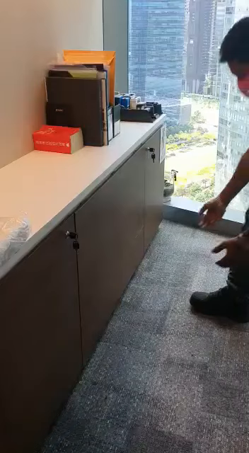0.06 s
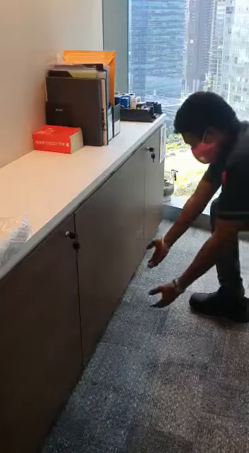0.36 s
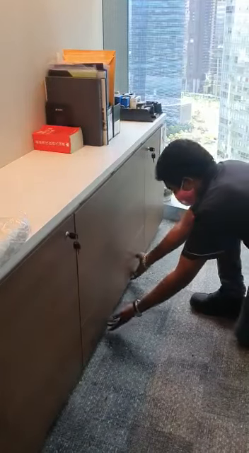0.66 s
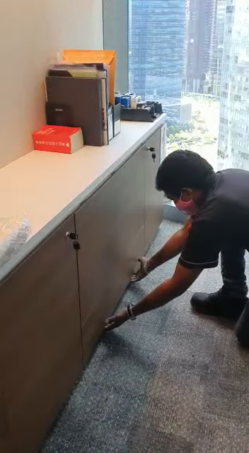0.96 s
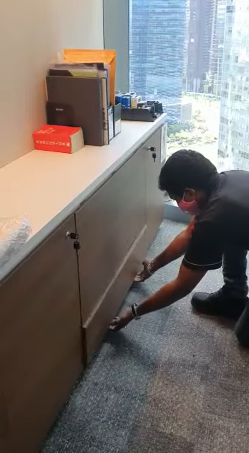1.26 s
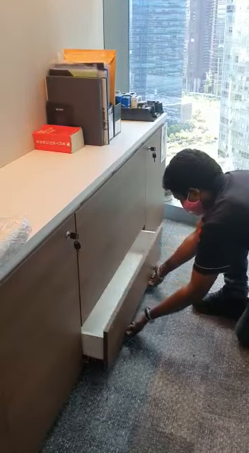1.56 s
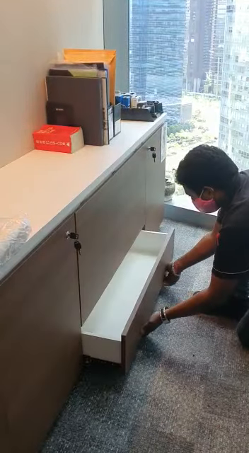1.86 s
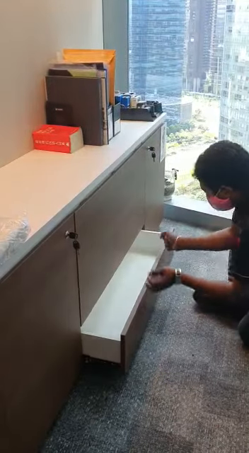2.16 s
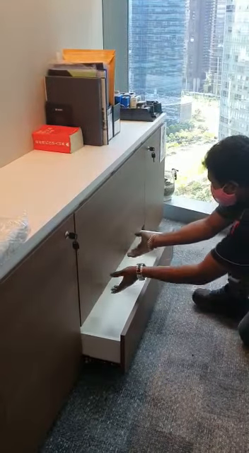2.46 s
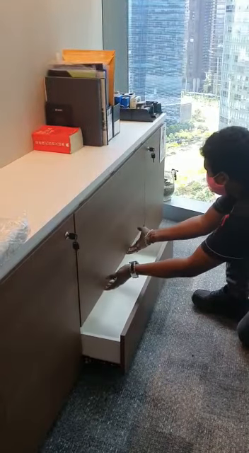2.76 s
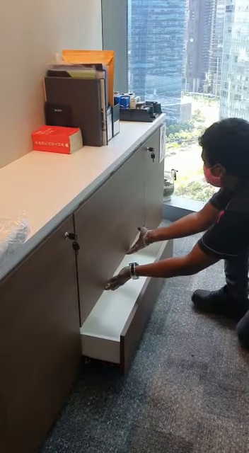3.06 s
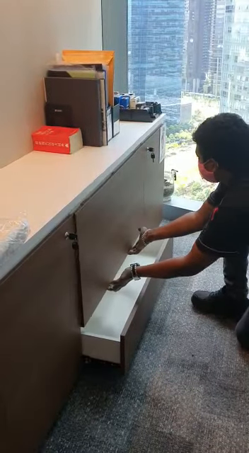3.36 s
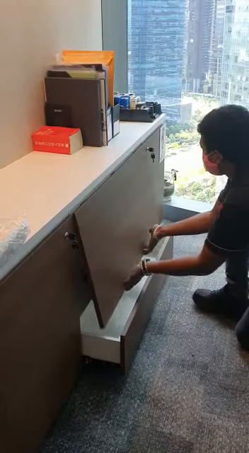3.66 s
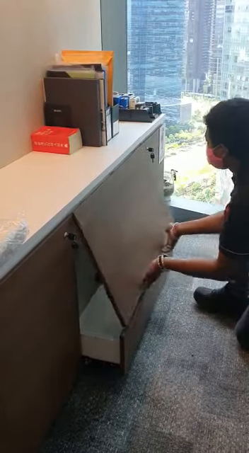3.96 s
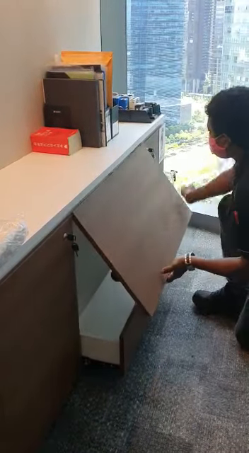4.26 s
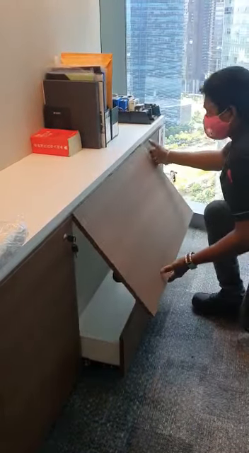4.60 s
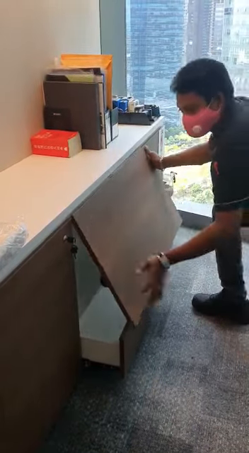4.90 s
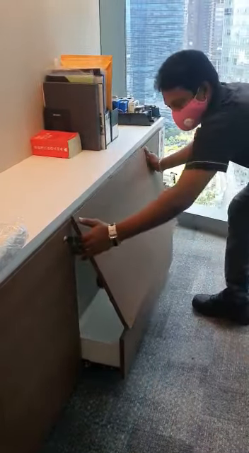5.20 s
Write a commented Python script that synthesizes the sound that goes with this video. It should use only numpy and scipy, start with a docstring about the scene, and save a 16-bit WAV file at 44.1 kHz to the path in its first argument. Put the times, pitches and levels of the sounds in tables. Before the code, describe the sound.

Low ventilation rumble fills a small carpeted office, picked up from a couple of metres. A dull bump on a wooden cabinet leads into the short scrape, thud and roll of a drawer opening. Cloth brushes softly against the wood. Then a panel is freed with hollow booms and clicks, and its board and fittings knock and rattle lightly as it is lifted.

```python
"""A wooden cabinet is bumped, its bottom drawer drawn out, and the panel above freed and swung up.
Blows make the hollow carcass boom in its low modes; boards knock and fittings click in higher ones.
The drawer scrapes and rolls by stick-slip friction, and sleeves and hands brush the wood.
Air conditioning rumbles through the carpeted office, and background hiss is stronger in the first second.
A phone listens from about two metres."""
import sys
import numpy as np
from scipy import signal
from scipy.fft import rfft, irfft
from scipy.io import wavfile
from scipy.ndimage import uniform_filter1d

SR = 44100
rng = np.random.default_rng(int(sys.argv[2]) if len(sys.argv) > 2 else 0)


def pcm_store(signal):
    """Save signal as 16-bit PCM."""
    levels = np.round(np.clip(np.atleast_2d(signal), -1, 1) * 32767)
    wavfile.write(sys.argv[1], SR, levels.astype(np.int16).T)


N = 230806

# Spectrum of the wood's crowded, short-lived modes. Each row: frequency in Hz, level in dB.
DENSE_MODES = [(200, 7), (600, 4.5), (900, -4.5), (1700, 6.5), (2300, 4.5), (3200, -0.5), (4600, -13),
               (6000, -10.5), (8700, -29), (12000, -27.5), (16000, -36.5)]
# Coherence of the two microphones. Each row: frequency in Hz, correlation from 0 to 1.
COHERENCE = [(100, .99), (250, 0.97), (500, 0.7), (1000, 0.46), (2500, 0.04), (6000, 0.02)]


def carcass_booms(build_cycles=0.98):
    """Modal excitation: where a soft, heavy blow lands decides which low cabinet modes answer."""
    # Each row: frequency in Hz, level in dB, T60 in seconds.
    modes = [(61.2, 2, 0.31), (77.9, 1, 0.35), (104.5, -1, 0.31), (120.4, 10.5, 0.15), (225.4, -1, 0.51),
             (329, -6, 0.38), (373, -9.5, 0.46)]
    # Each row: start in seconds, level in dB, favoured frequency in Hz, damping by the hand in 1/s.
    blows = [(0.515, -10.5, 68.1, 49), (0.55, -20.5, 76.6, 4.5), (1.338, -10, 174, 17.5),
             (1.423, -32, 64, 22), (1.713, -28.5, 308, 50), (3.368, -16, 188, 30),
             (3.378, -11.5, 180, 26.5), (3.383, -16.5, 58, 17), (3.403, -15, 120, 31),
             (3.41, -27.5, 385, 28), (3.493, -21.5, 104, 40), (4.483, -20.5, 98.7, 0),
             (4.494, -30.5, 347, 5.5), (4.935, -37.5, 304, -1), (5.017, -41.5, 88, 9)]
    # Each row: level of a blow in dB, fall-off around its favoured frequency in dB per octave.
    spread = [(-12, 36), (-7.5, 25), (-10.5, 6)]
    out, t = np.zeros((2, N)), np.arange(SR // 2) / SR
    for start, db, spot_hz, damping in blows:
        falloff = np.interp(db, *np.transpose(spread))
        boom = sum(undb(mode_db - falloff * abs(np.log2(hz / spot_hz)))
                   * fade(t, t60) * np.sin(2 * np.pi * hz * t) for hz, mode_db, t60 in modes)
        boom = boom * rise(t, build_cycles / spot_hz) * np.exp(-abs(damping) * t)
        add(out, start, np.tile(boom / abs(boom).max() * undb(db), (2, 1)))
    return lean(out, right_db=1.1)


def wood_knocks():
    """Impact of wood on wood: broad boards radiate a full-bodied knock."""
    # Each row: start in seconds, base level in dB, hardness in dB per octave, chatter in seconds,
    # favoured frequency in Hz.
    knocks = [(.072, -47.5, 0, 0.0017, 750), (1.337, -41, -5.5, 0.0051, 783), (1.423, -36, 0, .0025, 1555),
              (1.563, -49.5, -5, .001, 614), (3.368, -43, -3, .005, 414),
              (3.385, -39.5, -1.5, 0.0057, 2080), (4.470, -33, 0.5, 0.00082, 702),
              (4.484, -34.5, -0.8, 0.0026, 865), (4.926, -35, 0.85, 0.0056, 653),
              (4.941, -44, -1.5, 0.0079, 1147), (5.065, -56.5, -1.5, 0.0014, 1130)]
    # Gain in dB of each of the four registers, lowest first.
    balance = [1, -3.5, -14.5, -16.5]
    return contacts(knocks, balance, favour_db=2.5)


def fitting_clicks():
    """Impact of small parts: catches, runners and hinges radiate little bass, so they sound thin."""
    # Each row: start in seconds, base level in dB, hardness in dB per octave, chatter in seconds,
    # favoured frequency in Hz.
    clicks = [(.446, -49, -0.5, 0.00033, 2670), (.519, -41.5, -5, .002, 1590),
              (.527, -41, 2, 0.00033, 2830), (1.490, -35, -4.5, 0.00039, 12000),
              (1.7028, -34, 3, 0.000067, 2670), (3.408, -28, -3.5, 0.0039, 2020),
              (3.4725, -25.5, -0.5, 0.00017, 1800), (3.4805, -36.5, 1, 0.0006, 6270),
              (4.365, -32, 1, 0.0012, 3580), (4.366, -34.5, 4.5, 0.00092, 12400),
              (4.3765, -35.5, 3, .002, 1700), (4.461, -31, 0, 0.019, 1530),
              (4.908, -36.5, -6.5, 0.0047, 1690), (5.192, -40.5, 3, .0083, 2240),
              (5.196, -40, -1, 0.0036, 6000)]
    # Gain in dB of each of the four registers, lowest first.
    balance = [-13, -10.5, -14, -20.5]
    return contacts(clicks, balance, favour_db=10)


def contacts(events, balance_db, favour_db, pivot_hz=2040, rebound_cycles=0.902, blow_s=0.015):
    """Impact and rebound: a contact rings as it seats, and a second touch comb-filters the tone."""
    # Edges in Hz of the four registers: body, clack, edge and tick.
    edges = [280, 1200, 4000, 9000, 17000]
    out, t = np.zeros((2, N)), np.arange(SR // 2) / SR
    for start, db, hardness, chatter_s, spot_hz in events:
        hit = board_ring(t, spot_hz) + undb(-7) * early_echo(t)
        hit *= 1 - np.exp(-2 * t / chatter_s)
        rebound = np.array([np.interp(t - rebound_cycles / spot_hz, t, side, left=0) for side in hit])
        hit += 0.25 * rebound
        for register_db, lo, hi in zip(balance_db, edges, edges[1:]):
            tilt_db = hardness * np.log2(np.sqrt(lo * hi) / pivot_hz)  # harder contacts are brighter
            lift_db = favour_db * (lo <= spot_hz < hi)
            part = band(hit, lo, hi, order=4)
            part /= part[:, :int(blow_s * SR)].std()
            add(out, start, part * undb(db + register_db + tilt_db + lift_db - 1))
    return out


def board_ring(t, spot_hz, spot_db=10, spot_octaves=0.095):
    """Free vibration: a struck board cracks, then rings in damped modes, most near the favoured one."""
    # Each row: frequency in Hz, level in dB, T60 in seconds.
    modes = [(421.6, -5.5, 0.19), (585, 0, 0.22), (645.6, 0, 0.17), (696, -15.5, 0.34), (749, 2.5, 0.063),
             (887, -2.5, 0.15), (945, -2.5, 0.083), (1091.4, -0.5, 0.18), (1230, 10, 0.036),
             (1399, -14, 0.49), (1481, 11, 0.053), (1668, 2, 0.14), (1865, 14.5, 0.054), (1900, 0.5, 0.18),
             (2063, 15, 0.028), (2200, 1, 0.085), (2560, 8.5, 0.084), (2710, 4.5, 0.022), (2890, 5, 0.033),
             (3730, -3, 0.029), (4060, -10, 0.19), (4240, -9.5, 0.055), (4537, -15, 0.18),
             (5870, -14.5, 0.1), (6040, -22.5, 0.084), (10800, -35, 0.093), (11100, -28.5, 0.063)]
    hz, db, t60 = np.transpose(modes)[:, :, None]
    db = db + spot_db * np.exp(-(np.log2(hz / spot_hz) / spot_octaves) ** 2)
    phase = 2 * np.pi * hz * t + rng.uniform(0, 2 * np.pi, hz.shape)
    mic_phase = np.arccos(on_log(hz, COHERENCE)) * rng.choice([-1, 1], hz.shape) / 2
    decay = undb(db) * fade(t, t60)
    ring = np.array([(decay * np.sin(phase + side * mic_phase)).sum(0) for side in (-1, 1)])
    crack = undb(7) * fade(t, t60=0.014)
    grain = colour(noise(len(t)), DENSE_MODES) * (fade(t, t60=0.2) + crack)
    return unit(ring) + undb(-3) * unit(grain)


def drawer_scrape():
    """Sliding friction: the drawer front resonates as it rubs out of its seat."""
    # Each row: start in seconds, stop in seconds, level in dB, brightness in dB.
    pulls = [(1.0, 1.07, -45, 5), (1.058, 1.125, -30, 2), (1.12, 1.17, -36.5, 15), (1.16, 1.222, -36, -13),
             (1.29, 1.335, -38, -14)]
    # Each row: frequency in Hz, level in dB.
    spectrum = [(150, -6), (350, -10.5), (560, -2.5), (850, -7.5), (1400, -8.5), (1900, -1.5),
                (2600, -13.5), (4000, -21.5), (7000, -34), (10000, -40), (16000, -45)]
    # Each row: resonant frequency in Hz, width in Hz, gain in dB.
    resonances = [(581, 45, 6), (1240, 40, 4), (1830, 110, 9), (2420, 120, 3), (3820, 90, 4)]
    return friction(pulls, spectrum, resonances, slips_per_s=500, scatter_db=3, smooth_db=-3)


def drawer_roll():
    """Rolling contact: the box runs out on its rollers with fewer slips and a smoother noise."""
    # Each row: start in seconds, stop in seconds, level in dB, brightness in dB.
    pulls = [(1.41, 1.49, -44.5, 4), (1.46, 1.69, -37, -7.5)]
    # Each row: frequency in Hz, level in dB.
    spectrum = [(120, -10.5), (200, -12), (299, -12.5), (416, 0.5), (519, -13.5), (590, -7.5), (851, -12),
                (916, -19.5), (1420, -23.5), (2020, -16.5), (3250, -32.5), (16000, -55.5)]
    # Each row: resonant frequency in Hz, width in Hz, gain in dB.
    resonances = [(405, 26, -4), (599, 25, 8), (1064, 38, 12.5), (1445, 99, 15), (2010, 48, 4.5)]
    return friction(pulls, spectrum, resonances, slips_per_s=170, scatter_db=-1, smooth_db=7.5)


def friction(pulls, spectrum, resonances, slips_per_s, scatter_db, smooth_db):
    """Stick-slip: tiny random slips ring the wood over a smooth hiss, swelling with each pull."""
    t, tick_t = np.arange(N) / SR, np.arange(SR // 20) / SR
    slips = (rng.random(N) < slips_per_s / SR) * undb(scatter_db * np.clip(rng.standard_normal(N), -2, 2))
    tick = noise(len(tick_t)) * fade(tick_t, t60=0.06)
    ticks = signal.fftconvolve(slips[None], tick, axes=1)[:, :N]
    rub = colour(unit(ticks) + undb(smooth_db) * noise(N), spectrum, resonances)
    treble = weighted(rub, [(2000, 0), (6000, 0.84)])
    out = np.zeros((2, N))
    for start, stop, db, bright_db in pulls:
        speed = rise(np.maximum(t - start, 0), rise_s=0.041) * fade(np.maximum(t - stop, 0), t60=0.22)
        out += (rub + treble * (undb(bright_db) - 1)) * undb(db) * speed
    return out


def brushes_and_hiss(hiss_db=-4, flutter_db=1.48):
    """Modulated noise: background hiss swells in the first second; later, cloth and hands brush briefly."""
    # Each row: time of the peak in seconds, half length in seconds, level in dB.
    # The first row is the background hiss, the rest are brushes.
    swells = [(.44, 0.41, -56.5), (1.926, 0.062, -48), (2.084, 0.039, -45), (3.077, 0.02, -61),
              (3.345, 0.021, -57.5), (3.623, 0.044, -50.5), (4.01, .022, -57), (4.241, 0.049, -56),
              (4.717, 0.089, -52), (4.906, 0.049, -55)]
    # Each row: frequency in Hz, level in dB.
    spectrum = [(500, 4.5), (1200, 0.5), (2100, 8), (3500, 1), (6000, -13.5), (9000, -19), (13000, -13.5),
                (16000, -24)]
    t, source = np.arange(N) / SR, colour(noise(N), spectrum)
    swish, hiss = unit(band(source, 400, 4970)), unit(band(source, 3400, 0.45 * SR))
    flutter = undb(flutter_db * unit(uniform_filter1d(rng.standard_normal(N), size=300)))
    envelope = sum(undb(db) * np.exp(-((t - peak_s) / half_s) ** 2) for peak_s, half_s, db in swells)
    return lean((swish + undb(hiss_db) * hiss) * envelope * flutter, right_db=4.5)


def early_echo(t, delay_s=0.0084, rise_s=0.0045):
    """Scattering: the cabinet top and the wall throw a diffuse echo straight back."""
    late = np.maximum(t - delay_s, 0)
    envelope = fade(late, t60=0.075) * (1 - np.exp(-late / rise_s))
    return unit(colour(noise(len(t)), DENSE_MODES) * envelope)


def cabinet_direction(x):
    """Reflection and shadowing: nearby surfaces and the phone's body favour one microphone per band."""
    # Each row: frequency in Hz, right minus left level in dB.
    bearing = [(150, -1), (350, 5), (620, -1.5), (1000, 0), (2000, 5.5), (4000, 4), (8000, 2), (12000, 7)]
    return irfft(lean(rfft(x), on_log(freqs(x), bearing)), N)


def office_reverb(x, wet_db, t60, treble_t60=0.18):
    """Reverberation: a small room adds a diffuse tail whose treble the carpet absorbs first."""
    t = np.arange(SR * 3 // 4) / SR
    wash = colour(noise(len(t)), [(60, 12.0), (500, 1.5), (3000, -5.5), (8000, 4.5), (15000, -7.5)])
    treble = weighted(wash, [(2500, 0.2), (7000, 0.44)])
    tail = ((wash - treble) * fade(t, t60) + treble * fade(t, treble_t60)) * rise(t, rise_s=0.009)
    tail /= np.sqrt((tail ** 2).sum(1, keepdims=True))
    return x + undb(wet_db) * signal.fftconvolve(x, tail, axes=1)[:, :N]


def ventilation(level_db=-45.5, waver_db=0.6, early_db=3, early_s=0.69):
    """Broadband flow noise: a wavering rumble with a faint low resonance, a little stronger at first."""
    # Each row: frequency in Hz, level in dB.
    spectrum = [(12, -42), (20, -3.5), (70, 1), (130, -7), (172, -7.5), (241, -3.5), (399, -10), (485, -12),
                (527, -14), (1000, -21.5), (1860, -23.5), (2140, -27.5), (2820, -31), (7110, -38.5),
                (16000, -48.5)]
    waver = np.interp(np.arange(N), np.linspace(0, N, num=30), rng.standard_normal(30))
    early = 1 / (1 + (np.arange(N) / SR / early_s) ** 4)
    rumble = colour(noise(N), spectrum, resonances=[(211, 52, 4.5), (8350, 5800, -16.5)])
    return lean(rumble * undb(level_db + waver_db * waver + early_db * early), right_db=1)


def noise(n):
    """A diffuse field at two microphones: coherent in the bass, independent in the treble."""
    white = rng.standard_normal((2, n))
    alike = on_log(freqs(white), COHERENCE)
    mid, side = irfft(rfft(white) * np.sqrt([1 + alike, 1 - alike]), n)
    return unit(np.array([mid + side, mid - side]))


def colour(x, spectrum, resonances=()):
    """Filter by a (Hz, dB) curve plus Lorentzian (Hz, width in Hz, dB) peaks or dips, to rms 1."""
    f = freqs(x)
    peaks_db = sum(db / (1 + ((f - hz) / (width / 2)) ** 2) for hz, width, db in resonances)
    return unit(irfft(rfft(x) * undb(on_log(f, spectrum) + peaks_db), x.shape[-1]))


def weighted(x, gains):
    """Zero-phase filter through (Hz, linear gain) points."""
    return irfft(rfft(x) * on_log(freqs(x), gains), x.shape[-1])


def band(x, lo, hi, order=3):
    """Causal band-pass between lo and hi in Hz."""
    return signal.sosfilt(signal.butter(order, [lo, hi], "band", fs=SR, output="sos"), x)


def rise(t, rise_s):
    """Smooth build-up from 0 to 1."""
    return 1 - np.exp(-(t / rise_s) ** 2)


def fade(t, t60):
    """Exponential decay by 60 dB in t60 seconds."""
    return np.exp(-np.log(1000) * t / t60)


def lean(x, right_db):
    """Level difference between the microphones, right minus left."""
    return x * undb(np.outer([-1, 1], right_db) / 2)


def on_log(hz, points):
    """Interpolate (Hz, value) points on a log-frequency axis."""
    f, value = np.transpose(points)
    return np.interp(np.log(hz + 1), np.log(f), value)


def freqs(x):
    """Frequencies in Hz of the bins of x."""
    return np.arange(x.shape[-1] // 2 + 1) * SR / x.shape[-1]


def undb(db):
    """Decibels to amplitude ratio."""
    return 10 ** (np.asarray(db) / 20)


def unit(x):
    """Scale to rms 1."""
    return x / np.sqrt(np.mean(x ** 2))


def add(out, start_s, x):
    """Superpose x on out from start_s on."""
    i = int(start_s * SR)
    out[:, i:i + x.shape[1]] += x[:, :N - i]


def scene():
    """Superposition: the cabinet and its handling reverberate in the office, over the ventilation."""
    booms = office_reverb(carcass_booms(), wet_db=-22, t60=0.3)
    woodwork = cabinet_direction(wood_knocks() + fitting_clicks() + drawer_scrape() + drawer_roll())
    lighter_sounds = office_reverb(woodwork + brushes_and_hiss(), wet_db=-15.5, t60=0.4)
    return booms + lighter_sounds + ventilation()


def record(dry):
    """Gating and band-limiting: the phone's input opens after a moment and cuts the highest treble."""
    open_s, ramp_s, cutoff_hz = 0.056, 0.004, 15900
    opened = np.clip((np.arange(N) / SR - open_s) / ramp_s, 0, 1)
    return signal.sosfilt(signal.ellip(10, 0.2, 80, cutoff_hz, fs=SR, output="sos"), dry * opened)


dry = scene()
out = record(dry)
pcm_store(out)
```